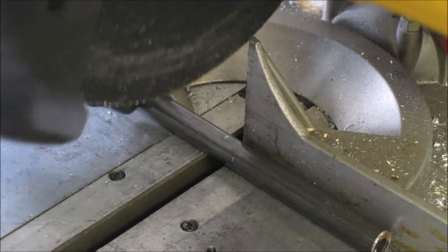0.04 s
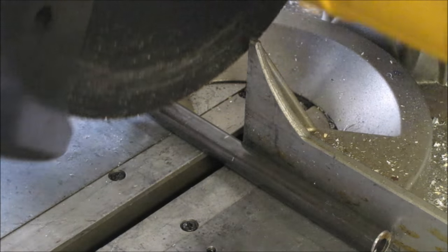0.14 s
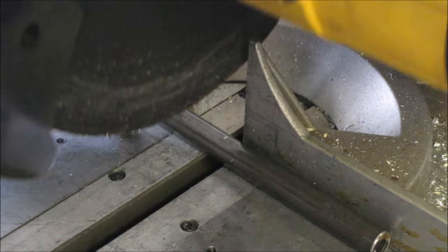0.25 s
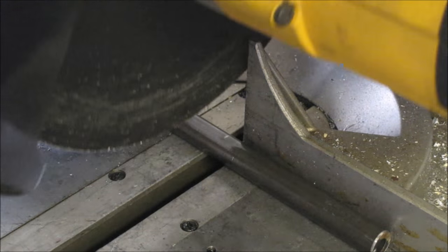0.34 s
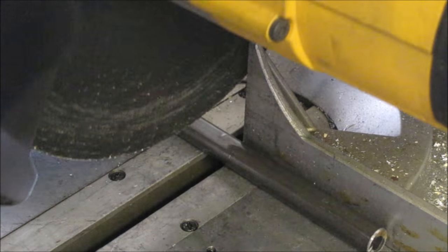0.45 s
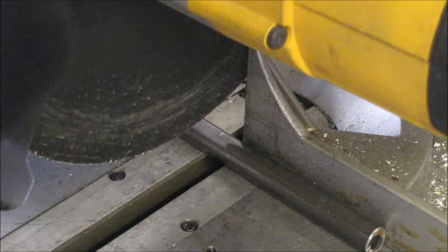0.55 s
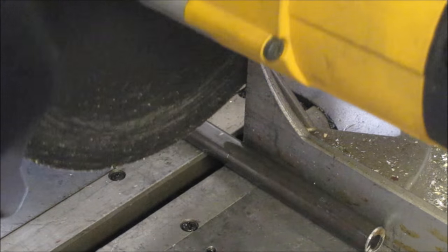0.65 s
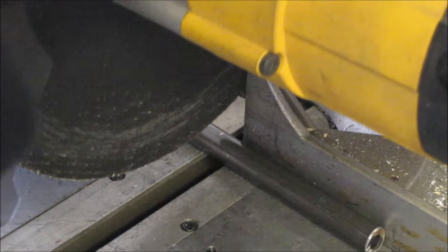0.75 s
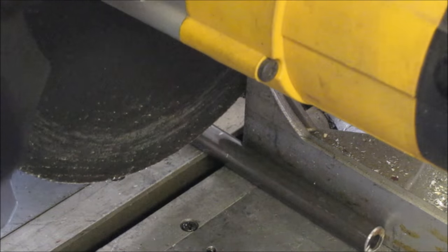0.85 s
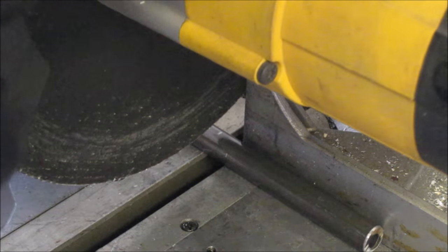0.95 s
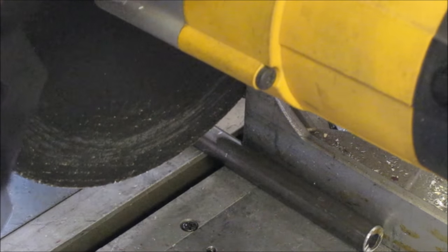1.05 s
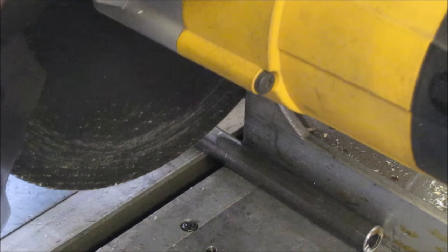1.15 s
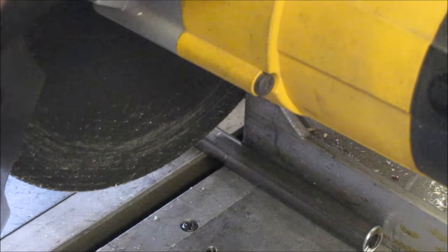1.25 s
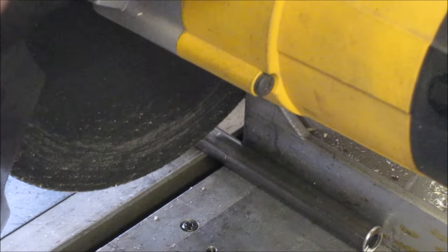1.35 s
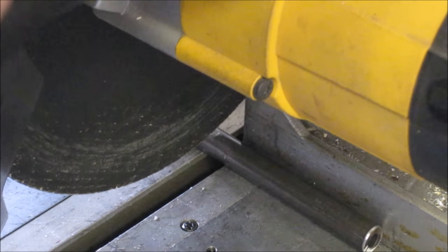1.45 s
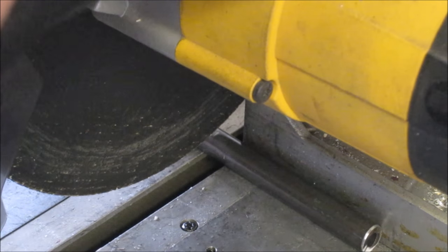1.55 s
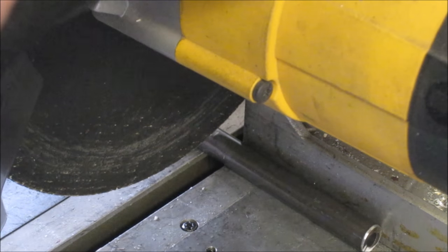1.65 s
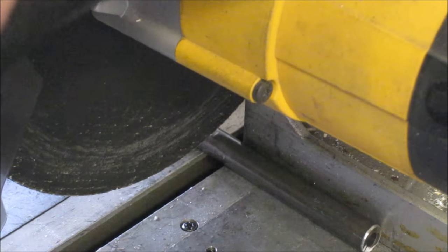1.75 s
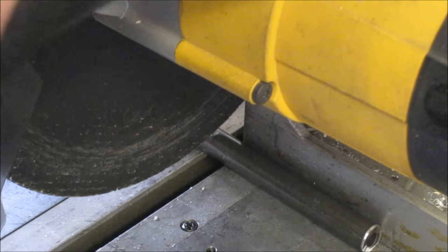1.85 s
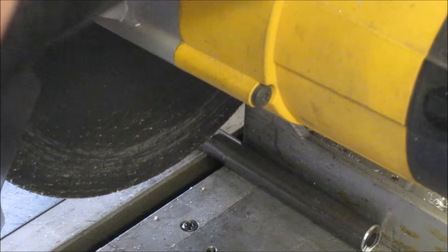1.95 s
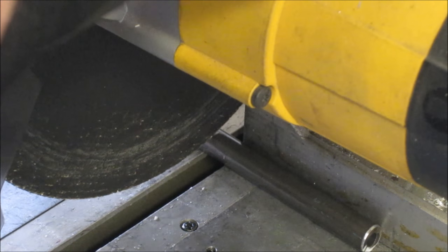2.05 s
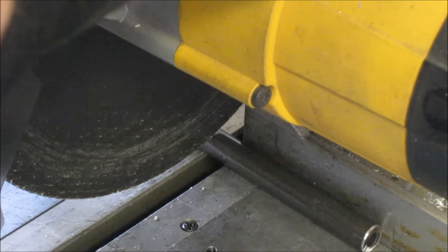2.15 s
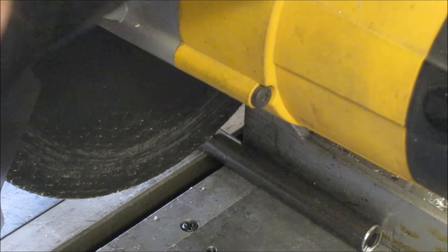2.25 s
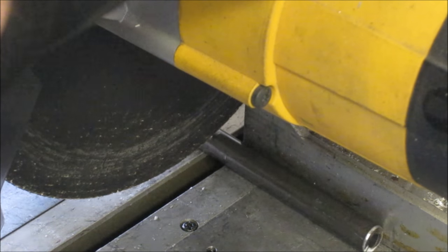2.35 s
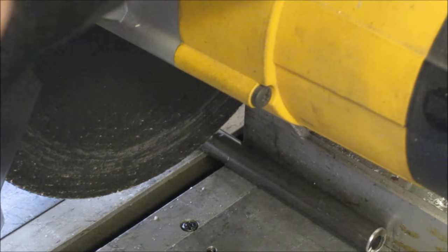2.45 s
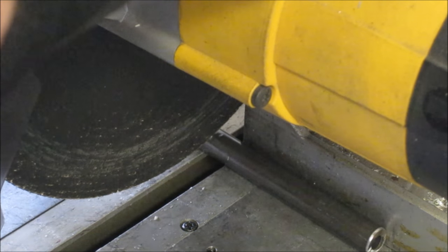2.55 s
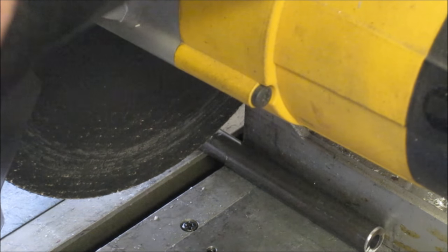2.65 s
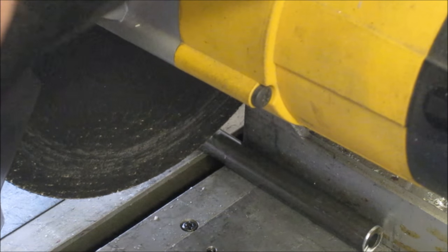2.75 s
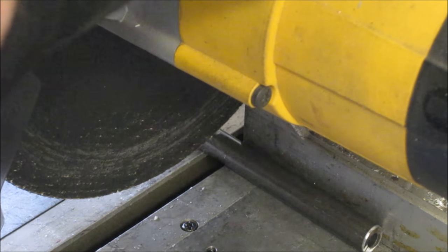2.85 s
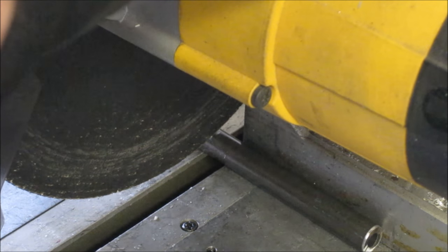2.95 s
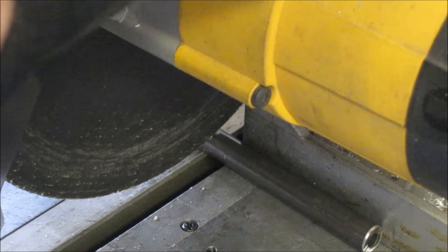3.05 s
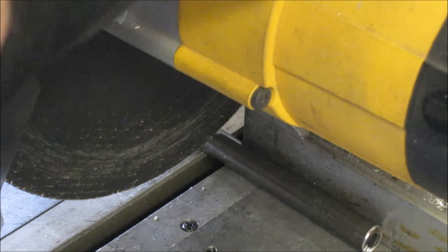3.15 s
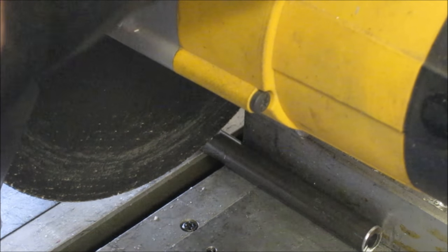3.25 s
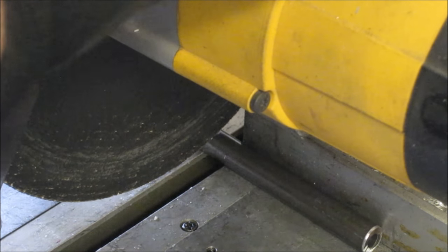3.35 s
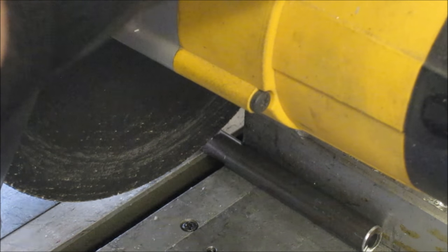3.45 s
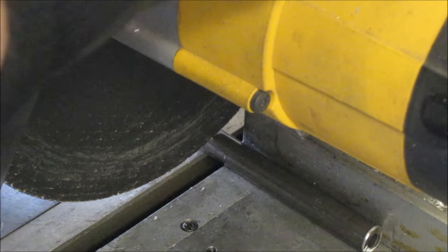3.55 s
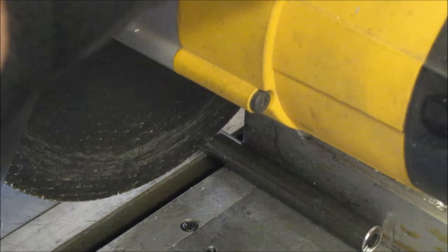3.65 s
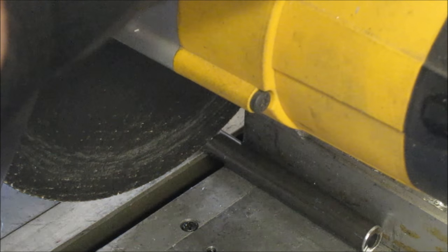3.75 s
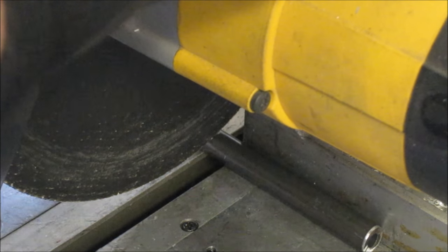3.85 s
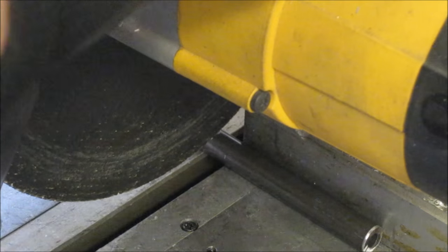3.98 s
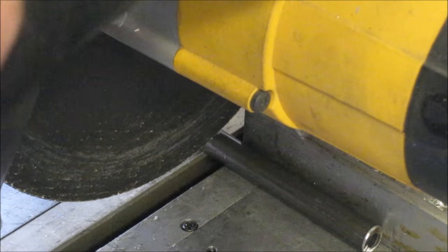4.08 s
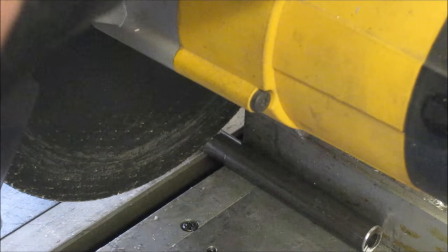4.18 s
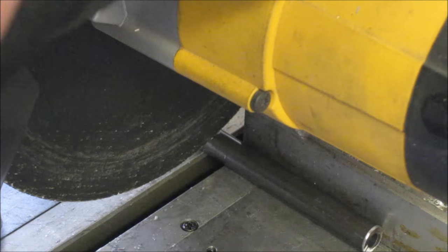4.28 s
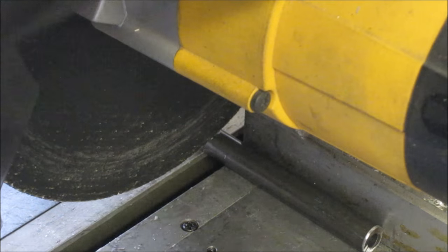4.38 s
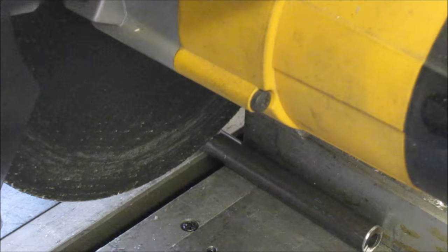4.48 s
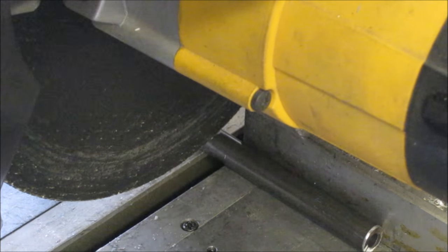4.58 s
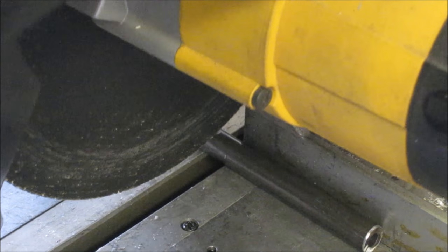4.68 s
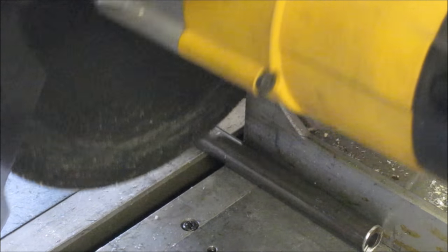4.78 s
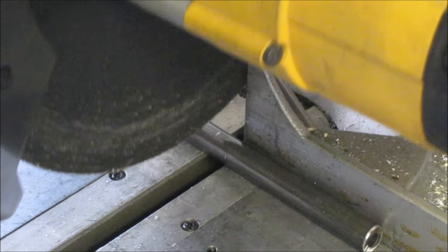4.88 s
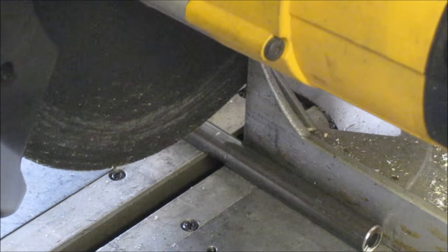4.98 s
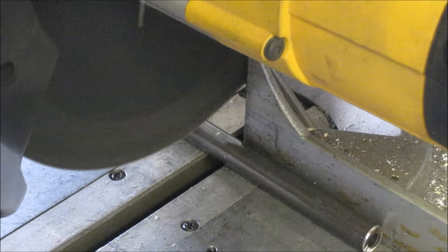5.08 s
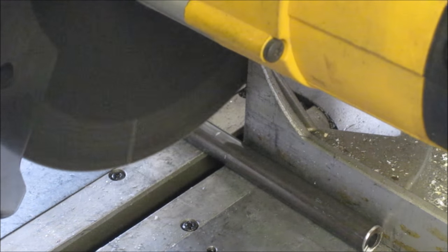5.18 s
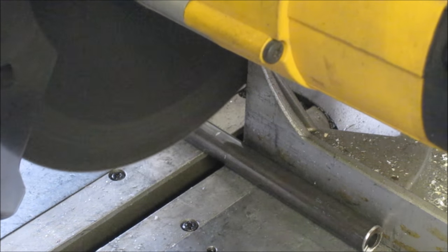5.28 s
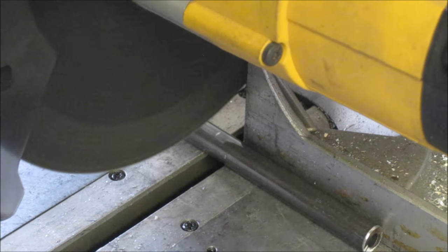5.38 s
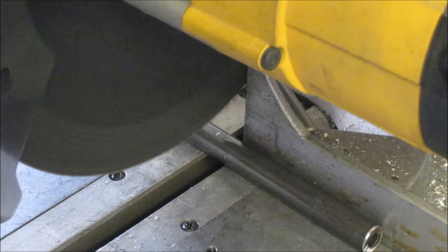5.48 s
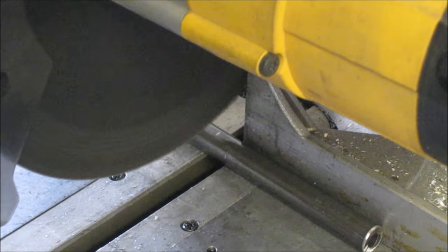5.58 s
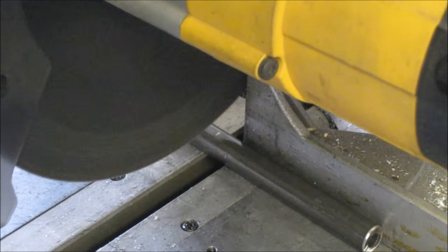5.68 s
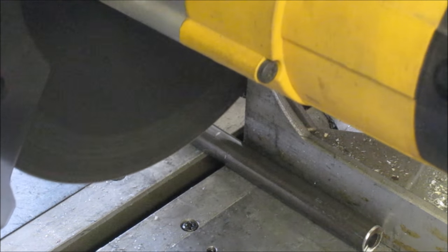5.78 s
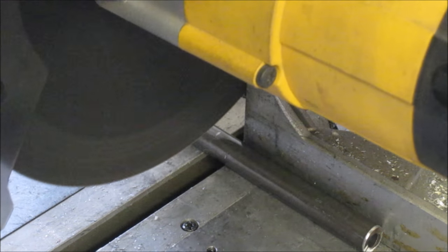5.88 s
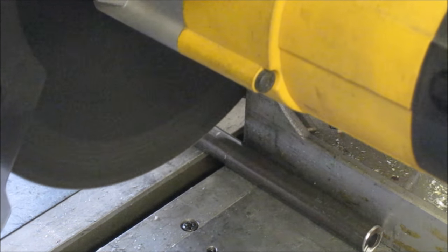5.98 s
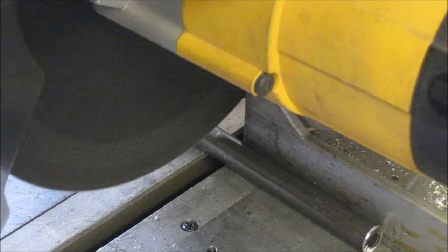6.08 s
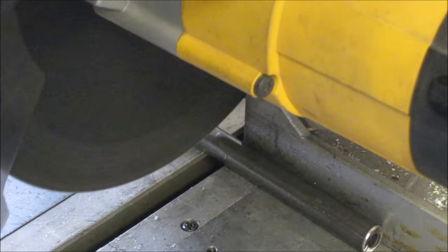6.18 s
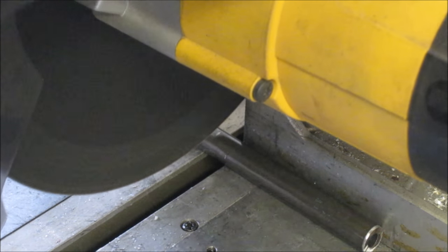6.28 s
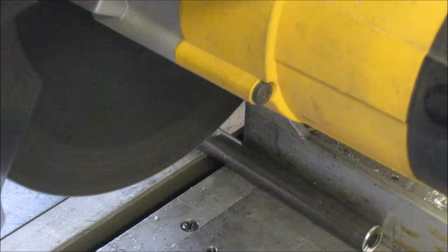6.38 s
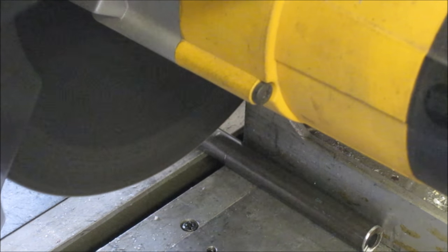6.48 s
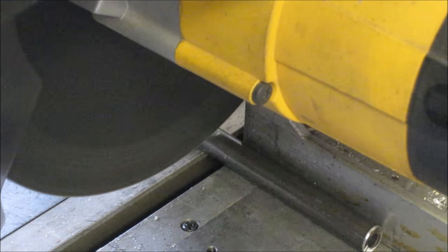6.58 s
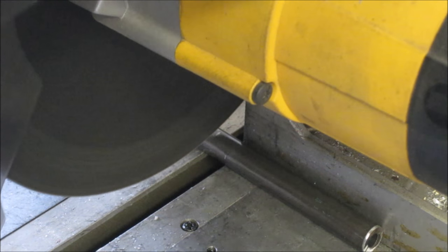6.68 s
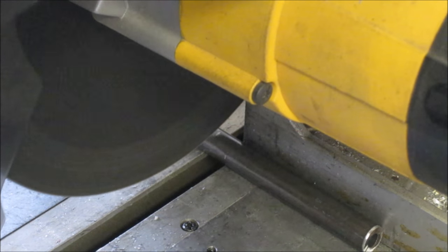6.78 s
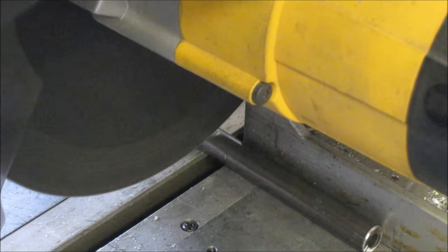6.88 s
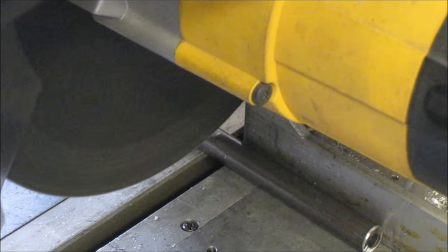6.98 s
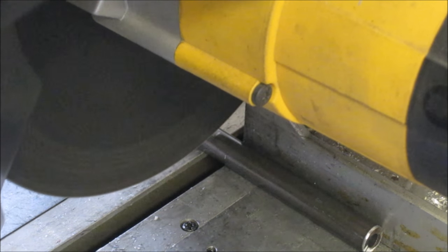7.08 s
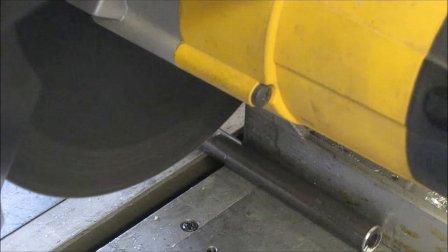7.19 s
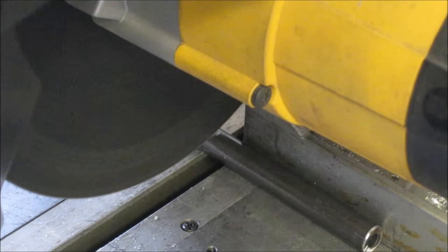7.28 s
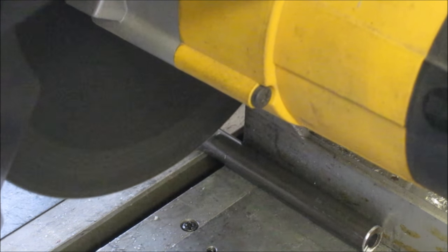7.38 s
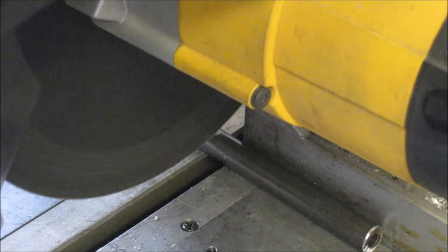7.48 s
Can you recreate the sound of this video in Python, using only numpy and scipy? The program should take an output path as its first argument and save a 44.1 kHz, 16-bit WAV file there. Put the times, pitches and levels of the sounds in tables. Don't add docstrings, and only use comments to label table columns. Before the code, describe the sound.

A workshop, close and mostly dry, with short wall reflections, faint distant machinery and hiss. From 0 s a hand and sleeve rub on the saw arm with thin steel ticks; a strong cast-metal knock lands at 0.36 s, a bright clamp ring at 0.89, lighter ticks until 1.6. The guard drags softly from 1.4 to 2. It is quiet, with a dull push near 2.5. Tight metallic clacks cluster at 3.26-3.35, with smaller taps at 3.74 and 4.0. Soft pushes follow at 4.2-4.3, rubbing swells, and the trigger creaks rapidly from 4.58 to 4.82, with a spring squeak and tiny clicks around 4.9. At 5.05 a very loud switch snap triggers a gritty mains growl; gear mesh and fan whine sweep upward steeply, then slowly, settling near 7 kHz by 6.5 over mid-range roar and hissing air. The motor runs on, uncut, to 7.5.

```python
import sys
import numpy as np
from scipy import signal
from scipy.fft import rfft, irfft, next_fast_len
from scipy.io import wavfile
from scipy.ndimage import uniform_filter1d, map_coordinates

SR = 44100
rng = np.random.default_rng(int(sys.argv[2]) if len(sys.argv) > 2 else 0)


def volts(x):
    e = np.asarray(x, float) / 20
    return 10 ** e


def wrap_up_sound(samples):
    columns = np.atleast_2d(samples).T
    tamed = np.clip(columns, -1, 1)
    steps = np.round(tamed * 32767).astype(np.int16)
    wavfile.write(sys.argv[1], SR, steps)


N = 332073
T = np.arange(N) / SR

# frequency in Hz, level in dB per Hz.
SHOP_COLOUR = [(15, -38), (25, -5), (264, -5.5), (376, -6), (419, -2.5), (480, -11.5), (826, 1.5),
               (896, -0.5), (999, -2.5), (1580, -4.5), (2310, -9), (3770, -19), (4440, -22), (11800, -43),
               (16300, -29)]

# time in seconds, pressure in dB.
HAND_PRESSURE = [(0, 7.5), (.1, 2.5), (.6, -1), (1.05, -3.5), (1.4, -4.5), (2.6, -3.5), (3.2, -6.5),
                 (3.48, -0.5), (3.62, -0.5), (3.8, -3.5), (3.94, 5.5), (4.1, 5), (4.18, -0.5), (4.35, 0),
                 (4.55, 7.5), (4.8, 12.5), (5.05, 1)]
# frequency in Hz, level in dB per Hz.
BODY_COLOUR = [(120, -54), (200, -41), (307, -16.5), (528, -5.5), (771, -12.5), (945, -2.5), (2300, -9),
               (2990, -20.5), (5060, -120)]
SCUFF_COLOUR = [(1060, -39), (1800, -5), (2200, -1), (2840, 1.5), (3600, 1.5), (3790, 1.5), (5640, -2.5),
                (7000, -14.5), (9100, -52), (15400, -120)]
FIZZ_COLOUR = [(3530, -55), (6000, -0.5), (7030, 2.5), (12200, -2), (14700, -16), (16300, -32)]
# level in dB, growth in dB per dB of pressure, grain in dB.
FRICTION = [
    (-44.5, 0.64, 1),
    (-46.5, 1.04, 1.7),
    (-52, 1.06, 1),
]
# start in seconds, length in seconds, body in dB, hiss in dB.
GUARD_DRAGS = [
    (1.407, 0.52, -46, -47),
    (4.7, 0.42, -35, -38),
]
# frequency in Hz, level in dB per Hz.
DRAG_COLOUR = [(1500, -34), (2600, -17), (3800, -7), (5000, 8), (6200, 3), (6900, -23), (9000, -45)]

# start in seconds, peak in dB, top of the treble in dB, t60 in seconds.
TICKS = [(0.014, -29, -15.5, 0.066), (0.0684, -26.5, -15, 0.052), (0.288, -35.5, -13, 0.046),
         (0.363, -21.5, -48, 0.025), (0.486, -36, -23, 0.05), (0.5776, -33.5, -14, 0.02),
         (0.7965, -33.5, -16, 0.039), (0.806, -36, -14, 0.028), (0.887, -17.5, -12, 0.047),
         (0.973, -34.5, -6, 0.043), (1.154, -25.5, -13.5, 0.021), (1.207, -29, -18, 0.091),
         (1.3828, -33.5, -21, 0.046), (1.398, -26.5, -16.5, 0.057), (1.487, -27, -5, 0.041),
         (1.568, -24.5, -22, 0.042), (3.1546, -41, -21, 0.043), (3.262, -32, -10, 0.033),
         (3.269, -18, -15, 0.042), (3.282, -14.5, -17, 0.023), (3.273, -21, -14, .04),
         (3.292, -31, -16, 0.043), (3.3, -42, -15, .05), (3.319, -31.5, -11, 0.044), (3.332, -45, -16, .05),
         (3.346, -37, -17, 0.042), (3.7387, -19.5, -24.5, 0.01), (4.0083, -22.5, -20.5, 0.038)]
# start in seconds, peak in dB.
CONTACT_CLICKS = [(4.871, -37), (4.878, -26), (4.897, -36), (4.905, -23), (4.912, -26), (4.9244, -22),
                  (4.9701, -24), (4.9831, -26), (4.998, -31), (5.0134, -29)]
# mode in Hz, level in dB, t60 in seconds.
GUARD_MODES = [(2830, -49.5, .15), (3250, -10, 0.12), (4020, -5, 0.033), (6310, -8, 0.046),
               (7780, -29, 0.087), (8600, -33, 0.047)]
# start in seconds, peak in dB, t60 in seconds, bass in dB.
KNOCKS = [(0.075, -23, 0.16, -22), (0.3595, -11.5, 0.15, -22), (0.363, -3.5, 0.13, -30),
          (0.378, -16.5, 0.17, -18), (0.387, -11, 0.14, -12), (0.408, -20, 0.5, -14),
          (0.978, -32, 0.17, -2), (1.209, -33, 0.36, 6), (3.261, -15, 0.098, 2), (3.267, -14, 0.19, 9),
          (3.282, -17.5, 0.28, 4), (3.32, -28, 0.2, 0), (4.009, -26, 0.17, 8)]
# mode in Hz, level in dB, t60 in seconds.
BASE_MODES = [(465, -12, .12), (750, -5, .2), (882, -5, .2), (1071, -15, .08), (1445, -12, .15),
              (1512, -13, .15), (1785, -10, .12), (2189, -5, .14), (2268, -5, .14), (2450, -13, .12),
              (3135, -17, .07), (4090, -18, .1)]
# mode in Hz, level in dB, t60 in seconds.
ARM_MODES = [(412.5, -6, .2), (525, -12, .2), (938, -6.5, .4), (333, -11.5, .2), (636, -8.5, .15),
             (775, -6, .15), (1096, -12, .15), (1270, -7, 0.092), (1640, -10, 0.11), (1787, -8, .12),
             (2130, -7, .2), (2490, -10, .2)]

# mode in Hz, level in dB, t60 in seconds.
CLAMP = [(2826, -8, .13), (3400, -4, .04), (3924, -5, .07), (4450, -4, .035), (5222, -12, .04),
         (6277, -7, .05), (6605, -15, .15), (7300, -9, .06)]
LEVER = [(2309, -17, .3), (3144, -2, .14), (3500, -3, .035), (4400, -8, .04), (6400, -12, .06),
         (7600, -10, .06)]
THUD = [(165, 0, 0.14), (215, -9, .1)]
# start in seconds, level in dB, modes of the part.
CHIMES = [
    (.889, -23.5, CLAMP),
    (1.207, -47, LEVER),
    (1.213, -34, LEVER),
    (.388, -42, THUD),
]
# centre in seconds, level in dB, half length in seconds,
# scuff in dB, low note in dB.
PUSHES = [
    (2.465, -37, 0.028, -9, 0),
    (4.23, -34, 0.028, 4, 10),
    (4.317, -41, 0.042, -10, 8),
]

# start in seconds, length in seconds,
# first and last slips per second, level in dB.
CREAK_RUNS = [
    (4.715, .043, 300, 330, -17),
    (4.771, .036, 330, 300, -18),
]
# start in seconds, level in dB.
SINGLE_SLIPS = [(4.584, -37), (4.591, -21), (4.593, -20), (4.595, -18), (4.599, -14), (4.605, -15),
                (4.611, -16.5), (4.62, -15), (4.62, -26), (4.6355, -15), (4.638, -16), (4.646, -12.5),
                (4.652, -14), (4.659, -18), (4.670, -13), (4.673, -22), (4.68, -17), (4.6878, -17),
                (4.692, -14), (4.698, -14), (4.7043, -14.5), (4.710, -16), (4.759, -18), (4.766, -18),
                (4.81, -18), (4.816, -29)]
# frequency in Hz, width in Hz, level in dB.
HANDLE = [(900, 70, 2), (1700, 200, -7), (2700, 150, -3), (3350, 170, -2), (4200, 78, -2), (5300, 90, 1.5),
          (6480, 80, 0), (7380, 80, -1), (7950, 90, -2), (8300, 110, 0), (9570, 100, -5), (10200, 60, -4),
          (11100, 60, 0), (11750, 120, -7), (12600, 120, -5), (13100, 120, -10), (14800, 400, -21)]
# start in seconds, length in seconds, level in dB.
SPRING_SQUEAKS = [
    (4.809, 0.027, -26.5),
    (4.905, 0.045, -24),
]
# frequency in Hz, level in dB per Hz.
SPRING_COLOUR = [(500, -43), (1000, -16.5), (1600, -24.5), (2600, -23.0), (3100, -9.5), (3500, -18.5),
                 (5500, -29), (6500, -48)]

# start in seconds, level in dB, hold in seconds, t60 in seconds.
SWITCH_HITS = [(5.0475, -21, .003, .015),
               (5.0525, -3, .0037, .01),
               (5.0595, -16, .002, .03), (5.065, -14, .002, .02), (5.075, -17, .001, .02)]
# frequency in Hz, level in dB per Hz.
SNAP_COLOUR = [(18, -44.5), (60, -28), (120, -23), (690, -11), (1370, -21), (1880, -6), (4370, -0.5),
               (4850, -4), (7590, -5.5), (8220, -7), (13900, -12.5), (16300, -39)]

# turns per second missing at switch-on, time constant in seconds.
RUN_UP = [
    (220.96, .1115),
    (199.96, .515),
]
# frequency in Hz, width in Hz, level in dB.
HOUSING = [(360, 50, -9), (476, 36, -8.5), (890, 110, -10), (1250, 64, 1.5), (1627, 41, -0.5),
           (2235, 120, -4), (2480, 100, -7), (2970, 190, -6), (3890, 310, -9.5), (4440, 250, -16)]
# time in seconds, housing roar in dB, air in dB, gear in dB.
RUN_LEVELS = [(5.08, -21.5, -41, -25.5), (5.14, -26.5, -36, -25), (5.22, -25.5, -34.5, -23.5),
              (5.45, -29, -31.5, -21), (6.0, -28.5, -31, -26), (6.77, -28.5, -32.5, -36.5),
              (7.53, -26.5, -33.5, -40)]
# multiple of armature speed, dB while speeding up, dB at full speed.
ARMATURE_ORDERS = [(1, -62, -58), (2, -54, -54), (4, -44, -50), (5, -50, -45), (7, -51, -45), (9, -48, -42),
                   (10, -38, -43), (16, -47, -43), (18, -39, -50), (21, -44, -57), (27, -48, -50),
                   (32, -41, -45), (36, -52, -62), (38, -37, -67)]
# multiple of wheel speed,
# dB while speeding up, dB at full speed.
WHEEL_ORDERS = [(1, -72, -65), (2, -60, -58), (4, -68, -56), (5, -59, -44), (6, -66, -53), (8, -62, -51),
                (11, -55, -46), (12, -53, -47), (14, -47, -49), (16, -58, -48), (41, -43, -42),
                (43, -42, -42), (44, -45, -50)]
# time in seconds, level in dB.
VENTS = [(5.3, -14), (5.45, 0), (5.62, 0), (5.7, -6), (5.8, -2), (5.9, -7), (6.4, -8), (6.5, 0)]
# frequency in Hz, level in dB per Hz.
ROAR_COLOUR = [(18, -62), (30, -78), (155, -25), (252, -18), (402, -7), (467, -6.5), (864, 2.5),
               (1190, 3.5), (1400, -1), (1540, 1), (1760, -2), (2280, 4), (2600, 2.5), (3380, -3),
               (5720, -120)]
AIR_COLOUR = [(1060, -58), (1800, -15.5), (2270, -30), (2910, -1.5), (3530, 6), (4170, 1.5), (4610, 2.5),
              (6420, -0.5), (7040, -0.5), (8870, -7), (10900, -6.5), (14900, -27.5), (15900, -31),
              (16300, -50)]
# frequency in Hz, level in dB per Hz.
TOOTH_WANDER = [(1, -10), (30, 0), (100, -5), (300, -18), (1200, -36)]
# frequency in Hz, gain in dB.
GEAR_CASE = [(900, -15), (1250, -1), (1450, -21), (1640, -6), (1950, -6), (2300, 4.0), (2750, -4.5),
             (3200, -1.5), (4500, -21)]
# frequency in Hz, level in dB per Hz.
LOADING_WANDER = [(1, -10), (60, 0), (300, -5), (900, -10), (1600, -40)]
# time in seconds, level in dB.
LOADING = [(5.12, -34.5), (5.21, -18.5), (5.24, -22), (5.28, -22.5), (5.33, -27), (5.45, -32), (5.6, -80)]

# frequency in Hz, t60 in seconds.
ROOM_T60 = [(200, 0.74), (2000, 0.47), (12000, 0.12)]
# time in seconds, threshold in dB.
THINNED = [(.639, 1), (.746, 0), (1.707, 1), (1.855, 0), (1.919, 0), (1.959, 1), (2.644, 0), (3.384, 3),
           (3.5, 3), (3.944, 2), (4.534, 5), (6.142, 3), (6.188, 1), (6.229, 3), (6.356, 2), (6.484, 3),
           (6.592, 3), (6.655, 2), (6.708, 5), (6.891, 2), (7.401, 1.5)]
PARTED = [1.085, 1.64, 2.595, 2.85, 3.13, 3.8, 3.985, 4.08, 5.92, 6.45, 6.78, 7.1, 7.51]

ARM_DOWN_S = 3
START_S, FULL_SPEED = 5.05, 381.96
GEAR_RATIO = 9 / 42


def unit(x):
    return x / np.sqrt(np.mean(x ** 2) + 1e-20)


def along(points, hz):
    f, v = np.transpose(points)
    return np.interp(np.log(hz + 1), np.log(f + 1), v)


def curves(rows):
    s, *cols = np.transpose(rows)
    return [np.interp(T, s, c) for c in cols]


def wobble(rate, t=T):
    coarse = t[::32]
    knots = rng.standard_normal(int(N * rate / SR) + 4)
    return np.interp(t, coarse, map_coordinates(knots, [coarse * rate], order=2))


def filtered(x, response):
    m = next_fast_len(len(x) + 8192)
    return irfft(rfft(x, m) * response(np.fft.rfftfreq(m, 1 / SR)), m)[:len(x)]


def noise(spectrum, size=N):
    return unit(filtered(rng.standard_normal(size), lambda hz: volts(along(spectrum, hz))))


def resonances(peaks, widen):
    def response(f):
        total = 0
        for k, (centre, width, db) in enumerate(peaks):
            damping = 1j * f * width * widen
            total = total + (-1) ** k * volts(db) * damping / (centre * centre - f * f + damping)
        return total
    return response


def add(track, s, sound):
    track[round(s * SR):][:len(sound)] += sound


def ring(modes, t, longest):
    out = 0
    for hz, db, t60 in modes:
        fade = volts(db + rng.normal(0, 2.7) - 60 * t / min(t60, longest))
        out = out + fade * np.sin(2 * np.pi * hz * t)
    return out


def swell(s, length, attack, release):
    return np.clip((T - s) / attack, 0, 1) * volts(-60 * np.clip(T - s - length, 0, None) / release)


def shop():
    duck = volts(-19 * np.clip((T - 5.06) / .15, 0, 1))
    whistle = volts(-68.5) * np.sin(2 * np.pi * 6150 * T)
    hum = volts(-63.0) * np.sin(2 * np.pi * 120 * T)
    return duck * (volts(-47 + wobble(5.85)) * noise(SHOP_COLOUR) + whistle + 0) + (1 - duck) * 0 * hum + (
        duck * duck * hum)


def rubbing():
    pressure_db, = curves(HAND_PRESSURE)
    out = np.zeros(N)
    for (db, grows, grain_db), colour in zip(FRICTION, (BODY_COLOUR, SCUFF_COLOUR, FIZZ_COLOUR)):
        out += volts(db + grows * pressure_db + grain_db * wobble(70) - 4) * noise(colour)
    body, scuff, hiss = noise(BODY_COLOUR), noise(SCUFF_COLOUR), noise(DRAG_COLOUR)
    for s, length, body_db, hiss_db in GUARD_DRAGS:
        slowing_db = -14.8 * np.clip(T - s, 0, 1)
        drag = swell(s, length, 0.085, 0.96) * volts(0.69 * wobble(70) + slowing_db)
        out += drag * (volts(body_db) * body + volts(hiss_db) * (hiss + 1.38 * scuff))
    return (T < 5.056) * out


def ticks():
    out, t = np.zeros(N + SR), np.arange(SR // 4) / SR
    clicks = [(s, db, 4, 0.016) for s, db in CONTACT_CLICKS]
    for s, db, top_db, t60 in list(TICKS) + clicks:
        t60 = np.clip(t60, .01, .25)
        hz = np.clip(9020 * 2 ** (top_db / 16.5), 2500, 12000)
        colour = [(1800, -19), (2500, -5.5), (3100, -2.0), (4400, -5), (5600, -8.0),
                  (8000, top_db + 5.5), (13000, top_db), (16000, top_db - 21)]
        puff = noise(colour, size=len(t))
        fade = volts(-60 * t / t60) + 0.48 * volts(-20 * t / t60)
        note = .5 * np.sin(2 * np.pi * hz * t) * volts(-25 * (hz / 3000) * t / t60)
        guard = 0.86 * ring(GUARD_MODES, t, longest=1.6 * t60)
        onset = 1 - np.exp(-(t / 0.00085) ** 2)
        add(out, s, volts(db - 7.5) * onset * (puff * fade + note + guard))
    return out[:N]


def knocks():
    out, t = np.zeros(N + SR), np.arange(SR // 4) / SR
    for s, db, t60, bass_db in KNOCKS:
        t60 = np.clip(t60, .03, .5)
        modes = BASE_MODES if s < ARM_DOWN_S else ARM_MODES
        colour = [(50, bass_db - 50), (110, bass_db - 2.5), (240, -20), (340, -11), (450, 0.5),
                  (620, -15.0), (860, -4.0), (1300, -6.0), (2300, -10.5), (3000, -15), (4500, -21), (6000, -42)]
        puff = 0.77 * noise(colour, size=len(t)) * volts(-60 * t / t60)
        main = 1.4 * ring(modes[:3], t, longest=0.68 * t60)
        others = 1.17 * ring(modes[3:], t, longest=0.5 * t60)
        onset = 1 - np.exp(-t / 0.0023)
        crack = 1 + 1.1 * volts(-60 * t / 0.04)
        add(out, s, volts(db - 14) * onset * crack * (puff + main + others))
    return out[:N]


def chimes():
    out, t = np.zeros(N), np.arange(SR // 4) / SR
    for s, db, modes in CHIMES:
        add(out, s, volts(db) * (1 - np.exp(-t / 0.00063)) * ring(modes, t, longest=.3))
    return out


def pushes():
    out, t = np.zeros(N), np.linspace(-.1, .15, SR // 4)
    for s, db, half, scuff_db, note_db in PUSHES:
        press = np.exp(-(t / np.where(t < 0, half, 1.63 * half)) ** 2)
        colour = [(200, -27), (310, note_db), (400, -7.0), (1000, -4), (3000, scuff_db),
                  (5300, scuff_db - 8.0), (6500, scuff_db - 13.0), (14000, scuff_db - 23), (16000, -50)]
        add(out, s + t[0], volts(db) * press * noise(colour, size=len(t)))
    return out


def trigger():
    slips = np.zeros(N + SR)
    unsteady, sizes = volts(1.4 * wobble(150)), volts(0.81 * rng.standard_normal(N))
    for s, length, first, last, db in CREAK_RUNS:
        start = round(s * SR)
        part = slice(start, start + round(length * SR))
        rate = np.linspace(first, last, part.stop - part.start) * unsteady[part]
        releases = np.diff(np.ceil(np.cumsum(rate) / SR), prepend=0)
        add(slips, s, volts(db) * sizes[part] * releases)
    for s, db in SINGLE_SLIPS:
        slips[round(s * SR)] = volts(db)
    slips = slips[:N]

    t = np.arange(SR // 50) / SR
    shake = rng.standard_normal(len(t)) * np.exp(-(t / 0.0029) ** 2)
    shake[0] = 6
    lines = rfft(shake)
    shake = 15 * irfft(lines / np.abs(lines), len(t))
    shaken = signal.fftconvolve(slips, shake)[:N]
    grit = signal.fftconvolve(slips, np.exp(-(t / 0.0022) ** 2))[:N] * rng.standard_normal(N)
    handle = resonances(HANDLE, widen=3.2)
    creak = filtered(shaken + 0.22 * grit, lambda hz: handle(hz) / (1 + 1j * hz / 18000) ** 2)

    squeaks = sum(volts(db) * swell(s, length, 0.014, 0.056) for s, length, db in SPRING_SQUEAKS)
    return volts(-1.0) * creak + squeaks * volts(0.74 * wobble(150)) * noise(SPRING_COLOUR)


def switch():
    out, t = np.zeros(N), np.arange(SR // 8) / SR
    onset = 1 - np.exp(-(t / .0012) ** 2)
    for s, db, hold, t60 in SWITCH_HITS:
        fade = volts(db - 60 * np.clip(t - hold, 0, None) / t60)
        add(out, s, fade * onset * noise(SNAP_COLOUR, size=len(t)))
    return out


def rotor():
    since = np.clip(T - START_S, 0, None)
    missing = sum(gap * np.exp(-since / tau) for gap, tau in RUN_UP)
    return np.clip(FULL_SPEED - missing, 0, None)


def inrush():
    fall = (rotor() / FULL_SPEED) ** 3.97
    lull_db = -5 * np.exp(-((T - 5.145) / 0.027) ** 2)
    growl_db = -16.5 - 58.5 * fall + lull_db
    hum_db = -39.5 - 44 * fall
    beat = 120 * T
    kicks = np.diff(np.floor(beat), prepend=0) * volts(1.6 * rng.standard_normal(N))
    rattle = 0.21 * rng.standard_normal(N) * (1 + 0.64 * np.cos(2 * np.pi * beat))
    growl = unit(filtered(kicks + rattle, resonances(HOUSING, widen=1)))
    hum = np.sin(2 * np.pi * beat)
    on = np.clip((T - START_S - .004) / 0.0038, 0, 1)
    return on * (volts(growl_db) * growl + volts(hum_db) * hum)


def fan_level(speed):
    hz = 19 * speed
    delay_s, cancelled_hz = .00357, 6275
    echo = .15 + .57 * np.exp(-((hz - 6420) / 330) ** 2)
    comb = np.abs(1 - echo * np.exp(2j * np.pi * (hz - cancelled_hz) * delay_s)) / (1 + echo)
    return volts(-19) * speed / FULL_SPEED * comb


def orders(turns, settled, t):
    out, vents_db = np.zeros(len(t)), np.interp(t, *np.transpose(VENTS))
    for table, ratio in ((ARMATURE_ORDERS, 1), (WHEEL_ORDERS, GEAR_RATIO)):
        for k, early_db, late_db in table:
            multiple = k * ratio
            broken = min(1, multiple / 4)
            db = early_db + (late_db - early_db) * settled
            db = db + 2.5 * broken - 5 * broken * np.abs(wobble(14, t))
            db = db + (multiple > 30) * vents_db
            phase = multiple * turns + 0.18 * wobble(40, t) + rng.uniform(0, 5.65)
            out += np.sqrt(2) * volts(db) * np.sin(phase)
    tube = volts(-29.5) * np.clip((t - 7.33) / 0.073, 0, 1)
    return out + tube * np.sin(11 * GEAR_RATIO * turns)


def fan(speed, turns):
    flutter = 2.3 * np.clip((5.345 - T) / .05, 0, 1) * wobble(400)
    level = np.clip((T - 5.2) / 0.14, 0, 1) * fan_level(speed) * volts(0.78 * wobble(30))
    return np.sqrt(2) * level * np.sin(19 * turns + 0.17 * wobble(51) + flutter)


def fan_loading(turns):
    level_db, = curves(LOADING)
    return volts(level_db) * np.sqrt(2) * np.sin(16.2 * turns + 1.3 * noise(LOADING_WANDER))


def gear_mesh(turns, settled):
    wander = (2.1 - .8 * settled) * noise(TOOTH_WANDER)
    mesh = np.sqrt(2) * np.sin(9 * turns + wander)
    return filtered(mesh, lambda hz: volts(along(GEAR_CASE, hz)))


def motor():
    speed = rotor()
    turns = 2 * np.pi * np.cumsum(speed) / SR
    settled = np.clip((speed - 320) / 50, 0, 1)
    on = np.clip((T - 5.056) / 0.0031, 0, 1)
    spinning = np.clip((T - 5.12) / 0.11, 0, 1)
    roar_db, air_db, gear_db = curves(RUN_LEVELS)
    tones = fan(speed, turns)
    run = slice(5 * SR, N)
    tones[run] += np.clip((T[run] - 5.25) / .15, 0, 1) * orders(turns[run], settled[run], T[run])
    gear = volts(gear_db) * gear_mesh(turns, settled)
    pulsing = 1 + 0.33 * np.sin(turns)
    air = noise(AIR_COLOUR) * volts(air_db + 10.5 + 0.76 * wobble(25)) * pulsing
    roar = noise(ROAR_COLOUR) * volts(roar_db + 0.5 + wobble(21))
    return on * (spinning * (tones + gear) + fan_loading(turns) + air + roar)


def room(x):
    hz, t, z = signal.stft(rng.standard_normal(SR // 2), SR, nperseg=256)
    fade = volts(-60 * t / along(ROOM_T60, hz)[:, None])
    tail = signal.istft(z * fade, SR, nperseg=256)[1]
    return signal.fftconvolve(np.pad(x, (300, 0)), tail / np.linalg.norm(tail))[:N]


def scene():
    hits = ticks() + knocks() + chimes() + trigger() + switch()
    mono = hits + volts(-14.5) * room(hits)
    mono = mono + motor() + inrush() + rubbing() + pushes() + shop()
    return np.array([mono, mono])


def thinned(x):
    out, size = np.pad(x, (0, 2048)), 1880
    window, hz = np.sin(np.pi * np.arange(size) / size), np.fft.rfftfreq(size, 1 / SR)
    for s, db in THINNED:
        block = out[round(s * SR) - size // 2:][:size]
        z = rfft(block * window)
        local = np.sqrt(np.abs(uniform_filter1d(np.abs(z) ** 2, size=60)))
        tilt_db = (7 if s < START_S else 2.6) * hz / 10000
        kept = z * (np.abs(z) > local * volts(db - 2.3 + tilt_db))
        kept *= volts(1.5 + .5 * db)
        block += window * (irfft(kept, size) - block * window)
    return out[:N]


def parted(x):
    side, size = np.zeros(N + 2048), 2048
    hz = np.fft.rfftfreq(size, 1 / SR)
    for s, centres in zip(PARTED, rng.uniform(5500, 12000, (len(PARTED), 2))):
        bands = (np.abs(hz[:, None] - centres) < 650).any(axis=1)
        block = np.pad(x, (0, size))[round(s * SR) - size // 2:][:size]
        level = np.abs(rfft(block) * bands)
        scattered = level * np.exp(2j * np.pi * rng.random(len(hz)))
        add(side, s - size / 2 / SR, np.hanning(size) * irfft(scattered, size))
    return volts(-4.0) * side[:N]


def roll_off(x):
    return signal.sosfilt(signal.butter(12, 16450, fs=SR, output="sos"), x)


def record(dry):
    mono = dry[0] / (1 + np.abs(dry[0] / .93) ** 6) ** (1 / 6)
    mono = filtered(thinned(mono), lambda hz: hz < 15870)
    side = parted(mono)
    return roll_off(np.array([mono + side, mono - side]))


dry = scene()
out = record(dry)
wrap_up_sound(out)
```